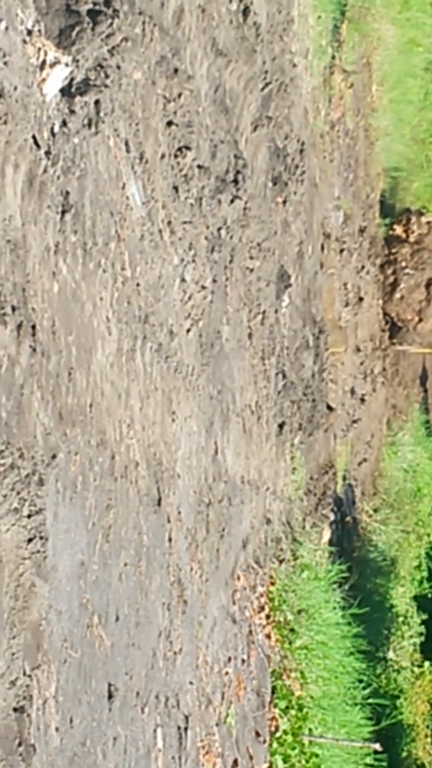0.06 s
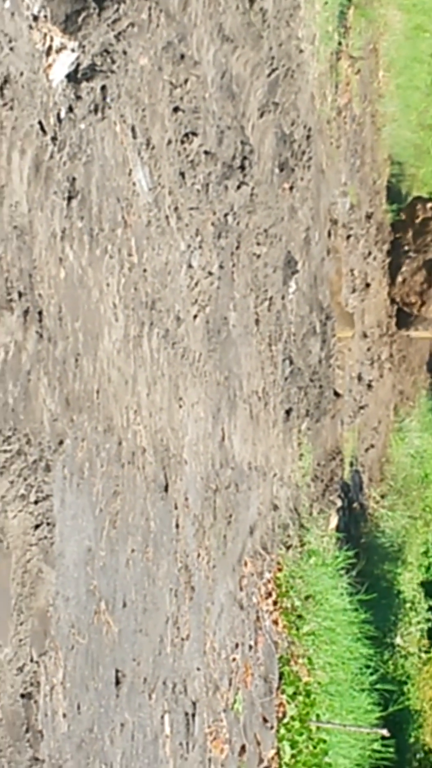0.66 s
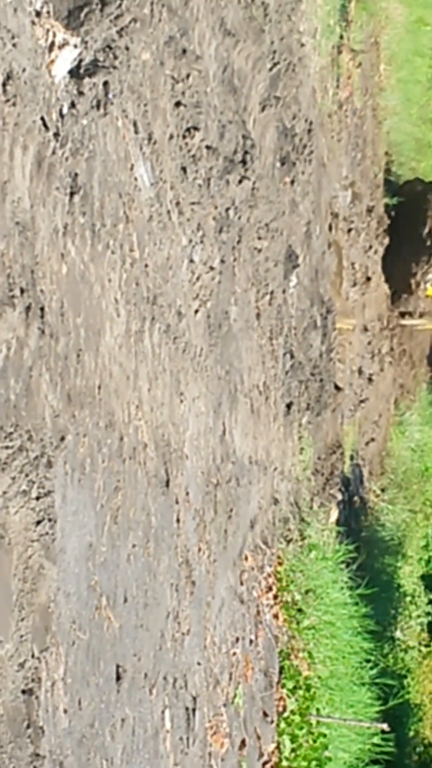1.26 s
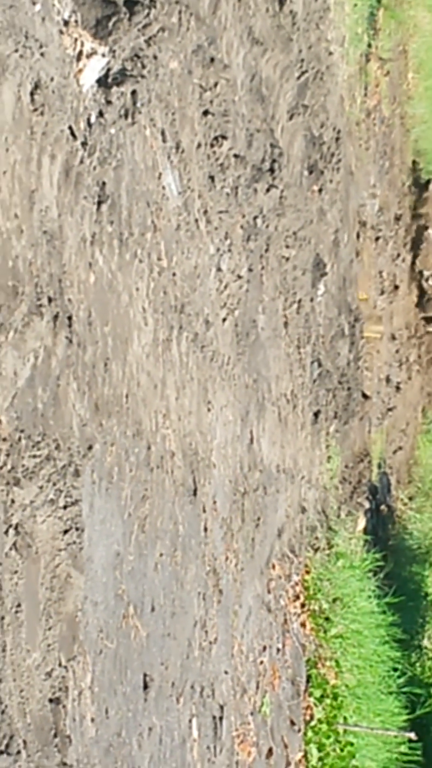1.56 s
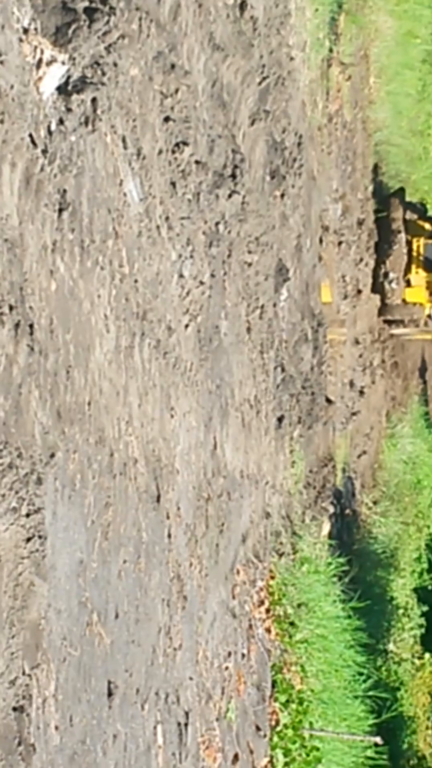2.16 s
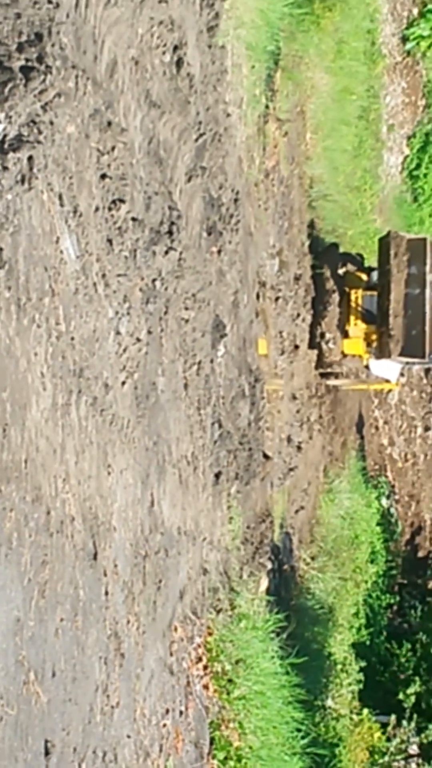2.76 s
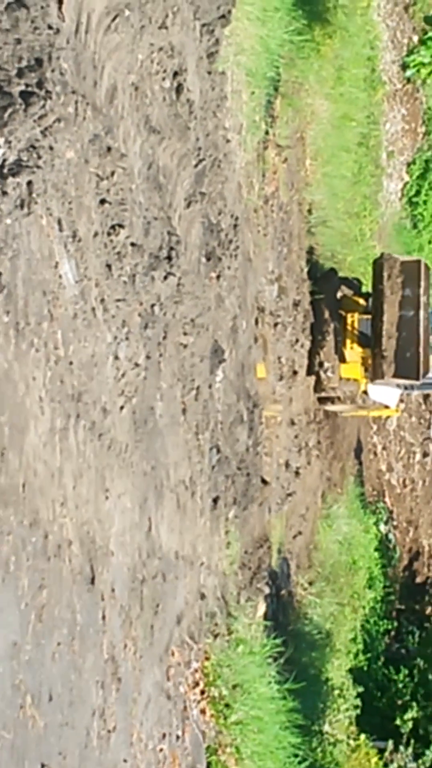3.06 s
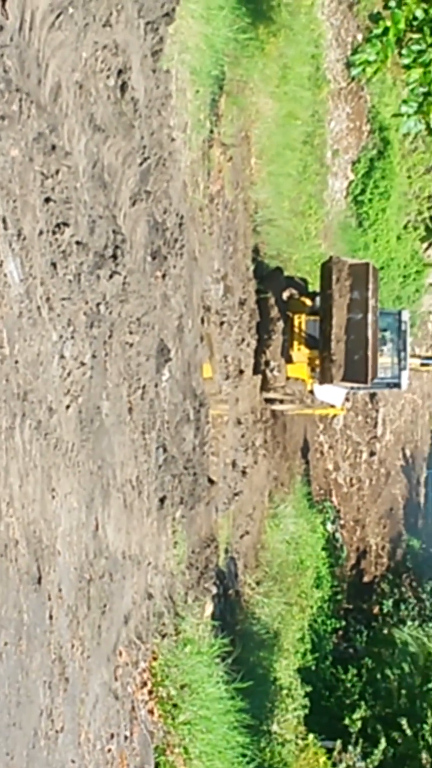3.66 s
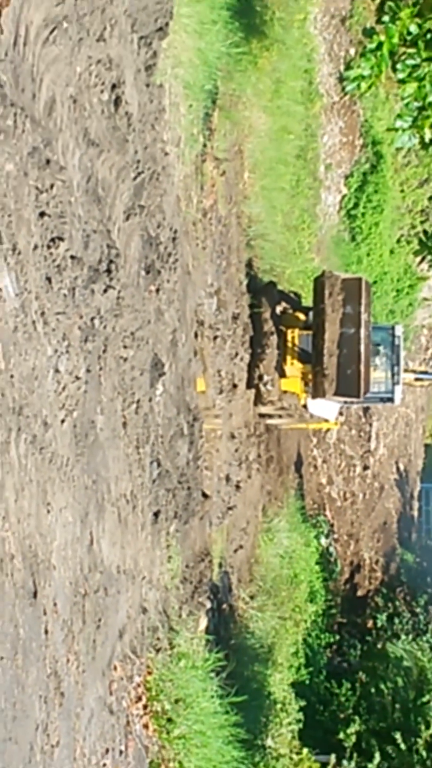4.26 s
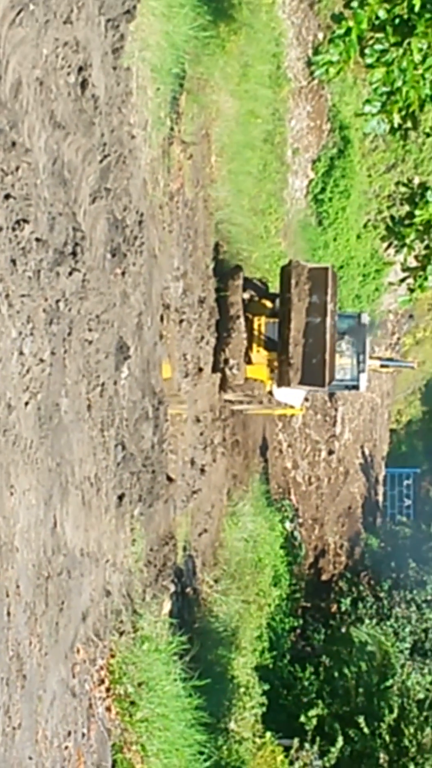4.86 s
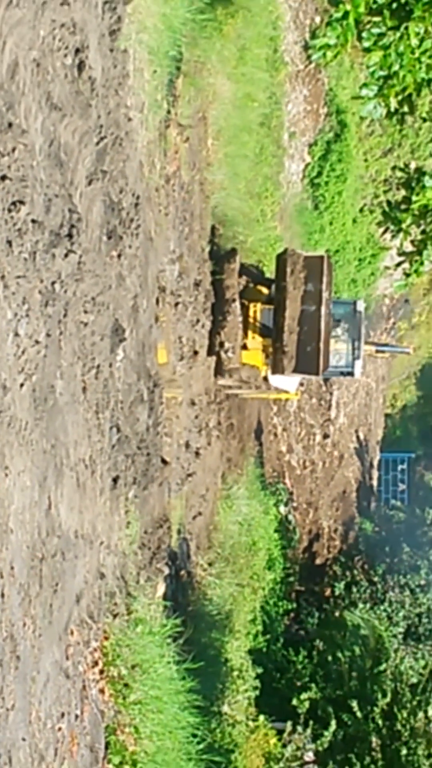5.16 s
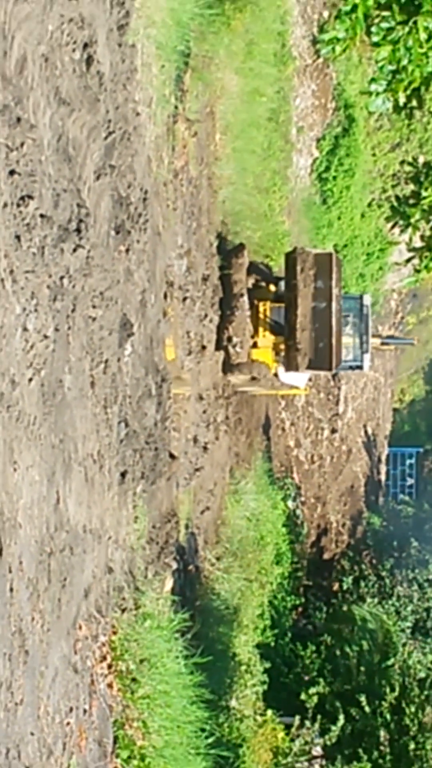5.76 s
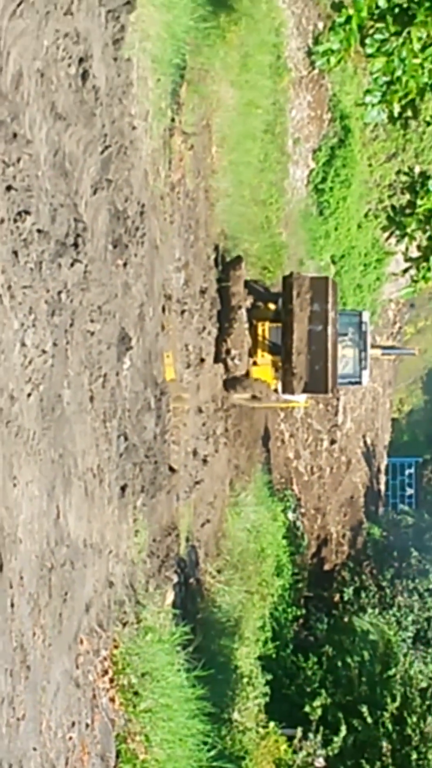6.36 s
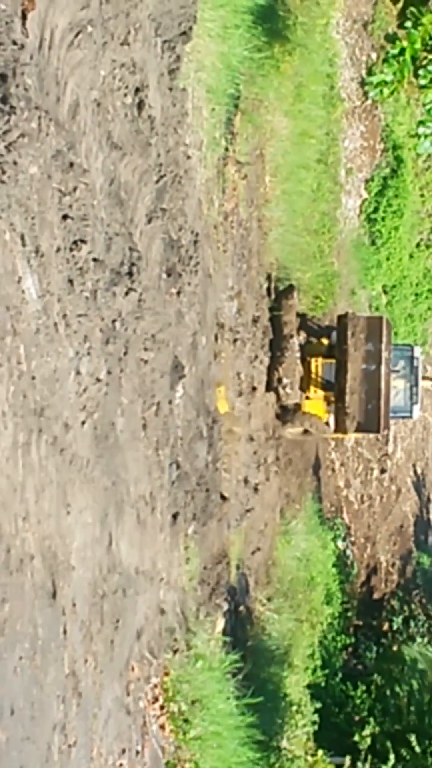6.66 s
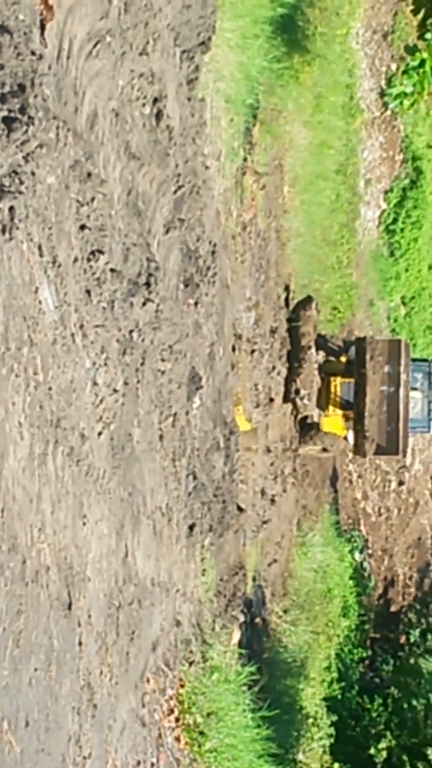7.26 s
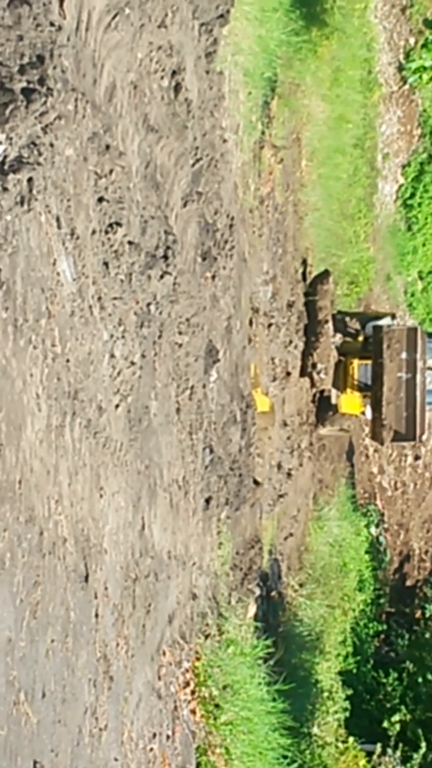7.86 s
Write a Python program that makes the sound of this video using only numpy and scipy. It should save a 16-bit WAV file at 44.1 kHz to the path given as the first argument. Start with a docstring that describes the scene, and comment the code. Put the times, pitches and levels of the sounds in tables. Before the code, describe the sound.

A hydraulic hammer pounds steel on stone about six times a second while a small dozer's diesel idles and revs up again outdoors.

```python
"""Something like a hydraulic hammer pounds about six times a second: each blow thuds in the housing,
clangs on the steel and rattles round the site. Its engine holds a steady drone. A small crawler dozer
works the bare earth; its diesel drops to idle, then revs up again and throbs against that drone.
Rubble slides in the first two seconds, and a thin whistle comes and goes while the dozer idles.
Underneath lies a constant bed of machine rumble and hiss, with light gusts on the microphone."""
import sys
import numpy as np
from scipy.fft import rfft, irfft, next_fast_len
from scipy.io import wavfile
from scipy.ndimage import map_coordinates

SR = 44100
rng = np.random.default_rng(int(sys.argv[2]) if len(sys.argv) > 2 else 0)


def persist_wave(psi):
    """Save psi, clipped to +-1, as 16-bit WAV."""
    counts = np.round(np.clip(psi, -1, 1) * 32767).astype(np.int16)
    wavfile.write(sys.argv[1], SR, np.atleast_2d(counts).T)


N = 358091

FIRST_BLOW_S, BEAT_S, QUICKEN_S, BLOW_COUNT = 0.0842, 0.16358, 0.000023, 50
FORCE_SCATTER_DB, PING_DETUNE = 0.44, 0.004  # blow to blow; the detune is a share of the pitch
DRONE_HZ, IDLE_HZ, WORK_HZ = 102.94, 78, 95  # firing rates
IDLE_DB, WORK_DB = -36, -26  # dozer exhaust gain at no load and full load
WHISTLE_START_S, WHISTLE_END_S, WHISTLE_FADE_S = 1.3, 3.9, 0.3
TOP_HZ = 10600

# How the stone takes the blows; bite rides on force, ping on bite:
# time_s, force_db, bite_db, ping_db, tilt_db_per_octave
STONE_RESPONSE = [(0, -23.5, -5.5, -6, -3.5), (1.2, -24.5, -7, -4, -3), (2.6, -24.3, -6.3, -5, 1.5),
                  (3.4, -25, -3.5, -3, -3), (4.3, -22.5, -2, -5, 0.5), (5.7, -23, -3, -2.5, 0),
                  (6.6, -22.5, -6, 2, 2.5), (7.4, -20.5, -5, -4, 3.5), (8.1, -21, -4, -4.5, -3)]
# Modes of the housing's thud, the steel's clank and the chisel's ping: pitch_hz, relative_db, t60_s
HOUSING_MODES = [(139.3, 1.5, 0.15), (169, 2.5, 0.13), (210.2, -1, 0.34), (259, -6, 0.27),
                 (382.4, -5, 0.41), (410.4, -8.5, 0.43), (476, -19, 0.22)]
STEEL_MODES = [(791.4, -9.5, 0.32), (809.6, -2, 0.64), (920, -9, 0.18), (1030, -1.5, 0.3),
               (1079, 2.5, 0.28), (1208, 4.5, 0.092), (1358, -8.5, 0.49), (1480, -14, 0.3),
               (1560, -14, 0.42), (1750, -9.5, 0.49)]
CHISEL_MODES = [(2272, -11, .3), (3057, -2, .2), (3413, -6, .2), (3612, 0, .16), (3690, -2, .15),
                (5626, -12, .35), (5890, -9, .2), (7477, -6, .45), (7823, -7, .4)]
# Colours of a blow's midrange clang, bright bite and sizzling grit: frequency_hz, relative_db
CLANG_SPECTRUM = [(120, -46), (300, -14.5), (560, -13), (720, -8), (810, -4), (930, -4), (1110, -1.5),
                  (1290, -7), (1600, -8.5), (2100, -16), (4000, -57)]
BITE_SPECTRUM = [(900, -34), (1600, -11), (2050, 3), (2550, -0.5), (3050, 4), (3700, 1), (4100, -2),
                 (5000, -5), (6500, -28), (9000, -69)]
GRIT_SPECTRUM = [(3500, -41), (5200, -12), (5800, -0.5), (6200, -4.5), (6800, 3), (7500, 1), (8300, 0),
                 (9000, -11.5), (10000, -21.5), (11000, -61)]
# The dozer's throttle moves: time_s, firing_hz
DOZER_REVS = [(0, 113), (.55, 108), (.95, 110), (1.15, 92), (1.5, 63), (2.1, 78), (2.6, 67), (4.5, 69),
              (4.85, 84), (5.15, 95.2), (8.12, 95)]
# Exhaust tones of the two engines: firing_multiple, relative_db
DOZER_PARTIALS = [(.5, -24), (1, -6.5), (1.5, -8.5), (2, -24.5), (2.5, -17), (3, -18.5)]
DRONE_PARTIALS = [(1, 1), (2, -19), (3, -26), (4, -26.5)]
# Rushes of sliding rubble: start_s, relative_db, rise_s, t60_s
RUBBLE_SLIDES = [(.1, -34, .006, 0.34), (.76, -27.5, .01, 0.29), (1.024, -28, 0.01, 0.2),
                 (1.36, -32.5, 0.012, 0.18), (1.392, -27, 0.007, 0.46), (1.62, -33, 0.021, 0.35)]
# Steel resonances under the rubble: pitch_hz, width_hz, gain_db
SCRAPE_RESONANCES = [(2350, 170, 5), (2710, 110, 6), (4450, 320, 3.5), (6660, 160, 10)]
# Colours of the rubble, machine bed, whistle and wind: frequency_hz, relative_db
RUBBLE_SPECTRUM = [(400, -21), (1400, -3), (2500, -1.5), (3700, -3.5), (5300, -2), (7300, -3), (8400, -7),
                   (10500, -36)]
RUMBLE_SPECTRUM = [(15, -34), (30, -26.5), (55, -12), (80, -2.5), (120, 1), (160, 0.5), (230, -3.5),
                   (320, -11.5), (420, -11), (600, -19.5), (1000, -24), (2000, -60)]
HISS_SPECTRUM = [(200, -8), (800, 1), (1400, -1.5), (1900, -4), (2600, -3.5), (3300, -3.5), (4200, -3.5),
                 (4700, -6), (5400, -2.5), (5700, -2.5), (6250, -1), (6900, 2), (7800, 1), (8500, -5.5),
                 (9200, -13.5), (10300, -31)]
WHISTLE_SPECTRUM = [(4500, -70), (5300, -35), (5620, 0), (5720, -5), (5850, -1), (6150, -30), (7250, -22),
                    (7520, 0), (7750, -25), (8500, -60)]
WIND_SPECTRUM = [(12, -24), (25, -19), (45, 1), (62, 1), (90, -4), (200, -43)]
# Gusts on the microphone: peak_s, relative_db, half_length_s
WIND_GUSTS = [(.15, -35, 0.42), (2.252, -31.5, .2), (4.8, -36, .17), (6.9, -32, 0.2)]
# How alike the two microphone ports sound: frequency_hz, correlation
STEREO_LIKENESS = [(30, 0.82), (70, 1), (700, 0.92), (1200, 0.82), (1800, 0.3), (3000, 0.46), (4000, 0.27),
                   (6000, 0.067), (9000, 0.067)]
# Lean of the stereo image: frequency_hz, left_minus_right_db
PORT_BALANCE = [(100, -0.6), (800, 0), (1100, 1), (1350, 4.5), (2500, 5.5), (4000, 6.5), (5200, 4),
                (6600, 11), (7300, 4.5), (7750, -4), (8300, -9.5), (9200, -7.5), (10000, -13)]
# Phase between the ports: frequency_hz, left_lead_rad
PORT_LEAD = [(550, 0), (850, 0), (1150, 0), (1500, 0.57), (1850, -1.2), (2250, 0.3), (3200, -.4),
             (4000, -1.8), (5300, -0.7), (6100, -4), (7000, -2.5), (8200, -3.5)]


def hammer():
    """Each blow thuds in the housing, rings the steel and shakes grit loose."""
    t = np.arange(SR // 3) / SR
    thud = amp(-0.93) * ring(t, HOUSING_MODES, rise_s=0.003, scatter_db=2.5, slip_rad=0.37)
    clank = amp(-4.5) * ring(t, STEEL_MODES, rise_s=0.0048, scatter_db=3.5, slip_rad=0.78)
    ping = ring(t, CHISEL_MODES, rise_s=0.0013, scatter_db=4.5, slip_rad=2.5)
    clang = amp(-1) * rattle(t, CLANG_SPECTRUM, repeat=0.48, rise_s=0.0013, hold_s=0.048, t60_s=0.27)
    bite = amp(-1.5) * rattle(t, BITE_SPECTRUM, repeat=0.35, rise_s=0.0011, hold_s=0.042, t60_s=0.25)
    grit = amp(-28) * rattle(t, GRIT_SPECTRUM, repeat=0.36, rise_s=0.0052, hold_s=0.029, t60_s=0.32)
    stone_times, *stone = np.transpose(STONE_RESPONSE)
    track = np.zeros((2, N))
    for i, start_s in enumerate(blow_times()):
        force_db, bite_db, ping_db, tilt = (np.interp(start_s, stone_times, col) for col in stone)
        force_db += rng.normal(0, FORCE_SCATTER_DB)
        chisel = detuned(ping[i], rng.normal(0, PING_DETUNE))  # it seats anew for each blow
        edge = amp(bite_db) * (bite[i] + amp(ping_db) * chisel)
        # harder stone shortens the contact and favours the upper modes
        brightness = lambda hz: amp(tilt * np.log2(np.clip(hz, 600, 1800) / 1050))
        steel = filtered(clang[i] + clank[i], brightness)
        body = amp(0.3 * tilt) * thud[i]  # and kicks back harder into the housing
        add(track, start_s, amp(force_db) * (body + steel + edge) + grit[i])
    return track


def blow_times():
    """The hammer's even beat, each gap a hair shorter than the last."""
    gaps_s = BEAT_S - QUICKEN_S * np.arange(BLOW_COUNT - 1)
    return FIRST_BLOW_S + np.r_[0, np.cumsum(gaps_s)]


def ring(t, modes, rise_s, scatter_db, slip_rad):
    """Decaying metal modes; each blow strikes them at a new strength and phase."""
    hz, db, t60_s = np.transpose(modes)[:, :, None]
    spread = stereo_angle(hz)  # high modes reach the two ports out of step
    phase = 2 * np.pi * (hz * t + rng.random(hz.shape))
    envelope = amp(db - 60 * t / t60_s) * (1 - np.exp(-t / rise_s))
    waves = envelope * np.exp(1j * np.array([phase + spread, phase - spread]))
    scatter, slip = rng.standard_normal((2, BLOW_COUNT, len(modes)))
    strikes = amp(scatter_db * scatter) * np.exp(1j * slip_rad * slip)
    return np.swapaxes((strikes @ waves).real, 0, 1)  # blow, side, sample


def rattle(t, spectrum, repeat, rise_s, hold_s, t60_s):
    """Dense ringing and echoes as one noise burst per blow: a share repeats, the rest is new."""
    takes = noise(spectrum, size=len(t), count=BLOW_COUNT + 1)
    envelope = (1 - np.exp(-t / rise_s)) * amp(-60 * np.maximum(t - hold_s, 0) / t60_s)
    return envelope * (np.sqrt(repeat) * takes[0] + np.sqrt(1 - repeat) * takes[1:])


def engines():
    """The governed engine holds its note; the dozer's slides past, louder as it revs, and beats with it."""
    dozer_db = IDLE_DB + (WORK_DB - IDLE_DB) * dozer_load()
    dozer = amp(dozer_db) * exhaust(dozer_firing_hz(), DOZER_PARTIALS, rough_db=1, drift_cycles=0.01)
    drone = amp(-25) * exhaust(np.full(N, DRONE_HZ), DRONE_PARTIALS, rough_db=0, drift_cycles=0.006)
    return dozer + drone


def exhaust(firing_hz, partials, rough_db, drift_cycles):
    """Low tones of a muffled diesel; uneven combustion shakes their level and timing."""
    cycles = np.cumsum(firing_hz) / SR + drift_cycles * wobble(8.3)
    tone = np.zeros(N)
    for multiple, db in partials:
        level = amp(db + rough_db * wobble(22))
        tone += level * np.sin(2 * np.pi * (multiple * cycles + rng.random()))
    return np.sqrt(2) * tone


def dozer_firing_hz():
    """The dozer's firing rate glides with the throttle."""
    return np.interp(np.arange(N) / SR, *np.transpose(DOZER_REVS))


def dozer_load():
    """How hard the dozer works: 0 at idle, 1 when revved up."""
    return np.interp(dozer_firing_hz(), [IDLE_HZ, WORK_HZ], [0, 1])


def rubble():
    """Broken stone slides over ringing steel in short grainy rushes."""
    t = np.arange(SR // 2) / SR
    flow = np.zeros((1, N))
    for start_s, db, rise_s, t60_s in RUBBLE_SLIDES:
        rush = amp(db - 60 * t / t60_s) * (1 - np.exp(-t / rise_s))
        add(flow, start_s, rush[None])
    grains = unit(amp(2.3 * wobble(500)) * noise(RUBBLE_SPECTRUM)[0])
    steel = lambda hz: 1 + sum(amp(db) * 1j * hz * width / (pitch ** 2 - hz ** 2 + 1j * hz * width)
                               for pitch, width, db in SCRAPE_RESONANCES)
    return amp(4.5) * filtered(flow * grains, steel)


def machine_bed():
    """Tracks and soil rumble; fans and hydraulics hiss, both a little more under load."""
    load = dozer_load()
    rumble = amp(-28.5 + load + 0.85 * wobble(6)) * noise(RUMBLE_SPECTRUM)[0]
    flicker_db = 0.39 * wobble(14) + 0.77 * wobble(150)
    hiss = amp(-29 + 0.75 * load + flicker_db) * noise(HISS_SPECTRUM)[0]
    return rumble + hiss


def whistle():
    """A thin hiss in two narrow bands, perhaps oil passing a valve, fades in and out."""
    t = np.arange(N) / SR
    fade = np.clip(np.minimum(t - WHISTLE_START_S, WHISTLE_END_S - t) / WHISTLE_FADE_S, 0, 1)
    return fade * amp(-40 + 1.6 * wobble(11)) * noise(WHISTLE_SPECTRUM)[0]


def wind():
    """Gusts swell out of a light breeze, buffeting each port on its own, the left one more."""
    t = np.arange(N) / SR
    breeze = amp(-47.5)
    gusts = sum(amp(db) * np.exp(-((t - peak_s) / half_s) ** 2) for peak_s, db, half_s in WIND_GUSTS)
    eddies = unit(filtered(rng.standard_normal((2, N)), lambda hz: amp(along(WIND_SPECTRUM, hz))))
    return (breeze + gusts) * amp(2.4 * wobble(8)) * amp([[1.5], [-4]]) * eddies


def noise(spectrum, size=N, count=1):
    """A stack of coloured stereo noises at rms 1, centred in the bass and wide in the treble."""
    def colour(hz):
        angle = stereo_angle(hz)
        return amp(along(spectrum, hz)) * [np.cos(angle), np.sin(angle)]
    mid, side = filtered(rng.standard_normal((count, 2, size)), colour).swapaxes(0, 1)
    return unit(np.stack([mid + side, mid - side], axis=1))


def stereo_angle(hz):
    """Stereo width in radians: 0 is mono, pi/4 leaves the sides unrelated."""
    return np.arccos(along(STEREO_LIKENESS, hz)) / 2


def detuned(sound, share):
    """A stereo sound repitched by a share of its pitch."""
    positions = np.arange(sound.shape[-1]) * (1 + share)
    return np.array([map_coordinates(side, [positions]) for side in sound])


def wobble(rate_hz):
    """Smooth random modulation through rate_hz knots a second."""
    knots = rng.standard_normal(int(N * rate_hz / SR) + 4)
    return map_coordinates(knots, [np.arange(N) * rate_hz / SR])


def filtered(x, response):
    """EQ a sound with a gain given as a function of frequency."""
    n = x.shape[-1]
    padded = next_fast_len(n + 4096)
    return irfft(rfft(x, padded) * response(np.fft.rfftfreq(padded, 1 / SR)), padded)[..., :n]


def along(points, hz):
    """Read a curve on a log frequency axis."""
    knots_hz, values = np.transpose(points)
    return np.interp(np.log(hz + 1), np.log(knots_hz + 1), values)


def add(track, start_s, sound):
    """Mix a sound into the track at its cue."""
    part = track[:, round(start_s * SR):][:, :sound.shape[-1]]
    part += sound[:, :part.shape[-1]]


def amp(db):
    """Decibels to gain."""
    return 10 ** (np.asarray(db) / 20)


def unit(x):
    """Normalise to rms 1."""
    return x / np.sqrt(np.mean(x ** 2) + 1e-20)


def scene():
    """All the machines on the site, with sliding rubble and a light breeze."""
    return hammer() + engines() + rubble() + machine_bed() + whistle() + wind()


def record(dry):
    """The two microphone ports colour and delay the treble differently; nothing passes above TOP_HZ."""
    def ports(hz):
        split = np.array([[0.5], [-0.5]])
        balance = amp(split * along(PORT_BALANCE, hz))
        balance /= np.sqrt(np.mean(balance ** 2, axis=0))
        delay = np.exp(1j * split * along(PORT_LEAD, hz))
        return balance * delay * (hz < TOP_HZ)
    return filtered(dry, ports)


dry = scene()
out = record(dry)
persist_wave(out)
```